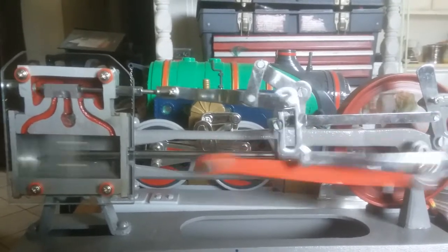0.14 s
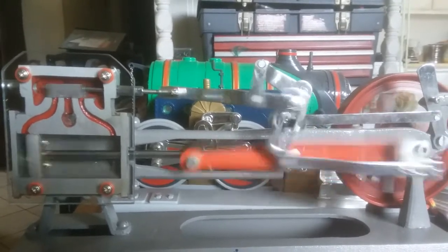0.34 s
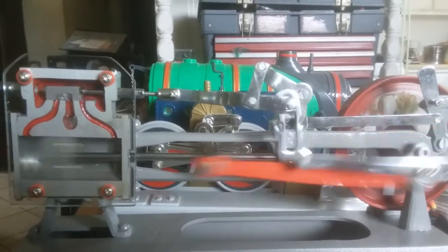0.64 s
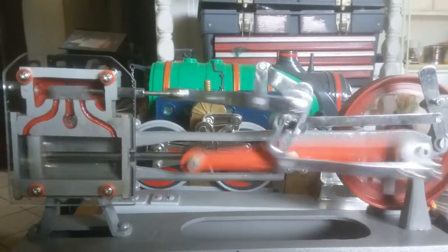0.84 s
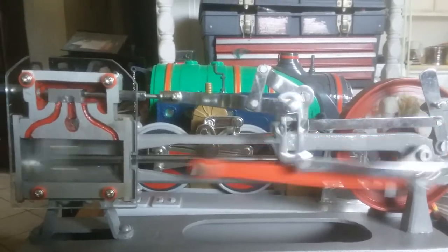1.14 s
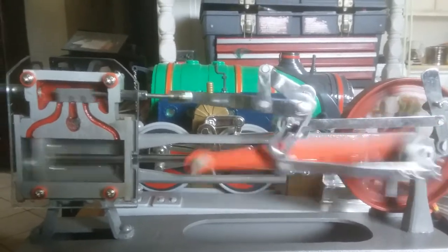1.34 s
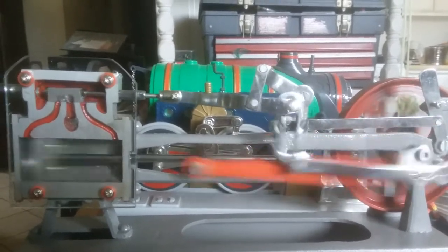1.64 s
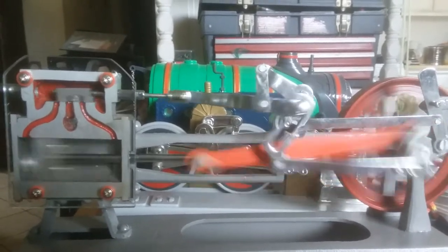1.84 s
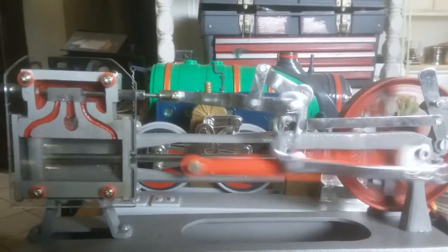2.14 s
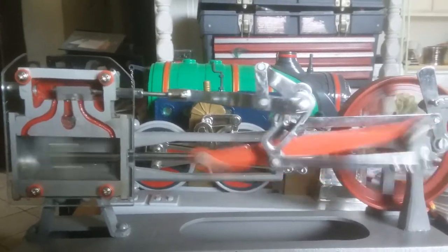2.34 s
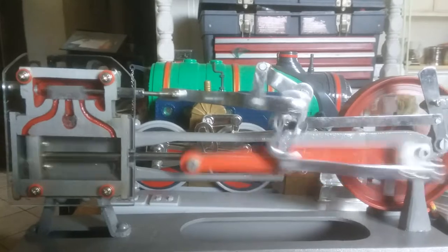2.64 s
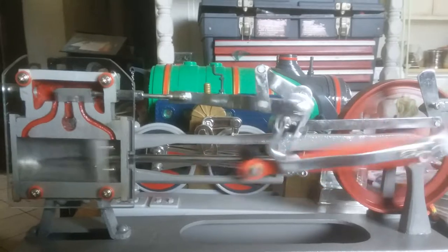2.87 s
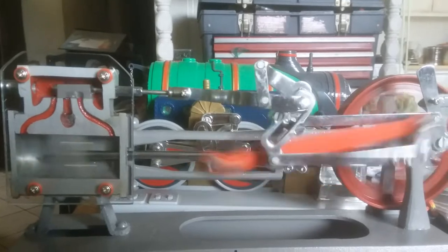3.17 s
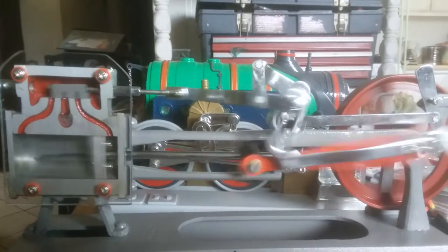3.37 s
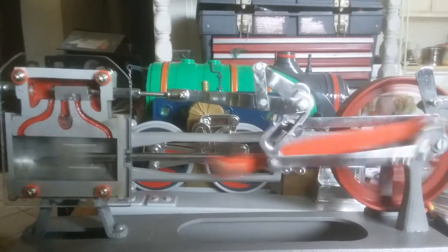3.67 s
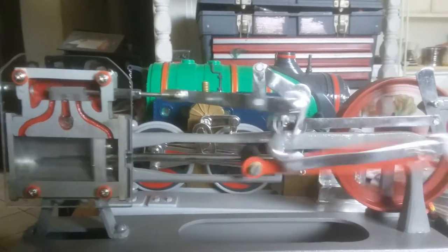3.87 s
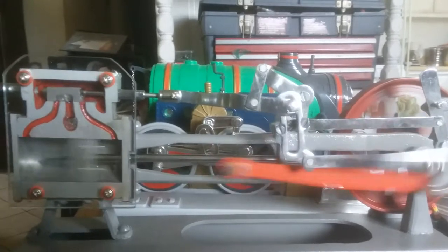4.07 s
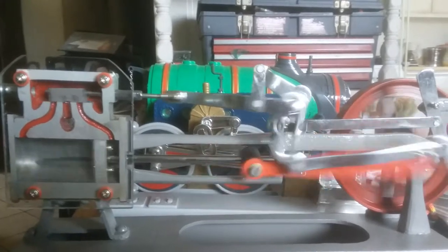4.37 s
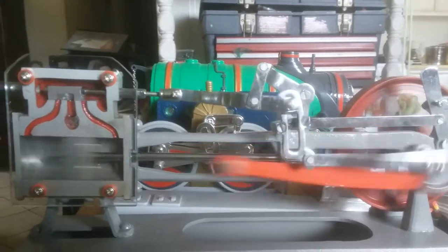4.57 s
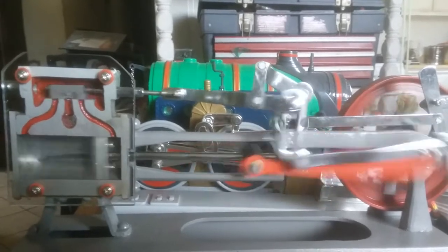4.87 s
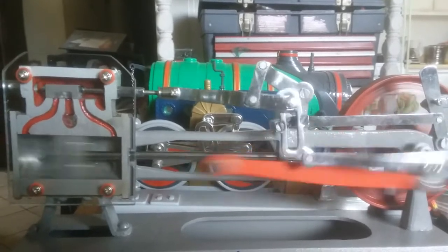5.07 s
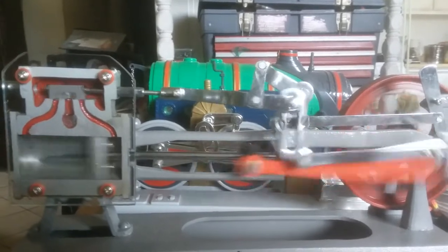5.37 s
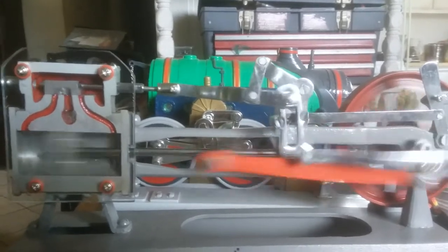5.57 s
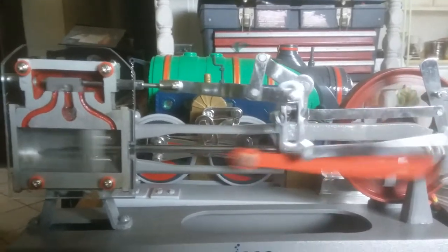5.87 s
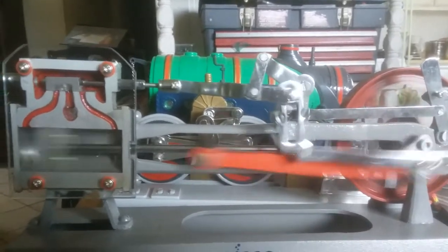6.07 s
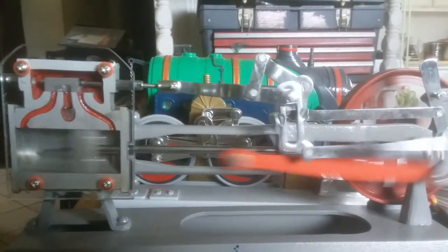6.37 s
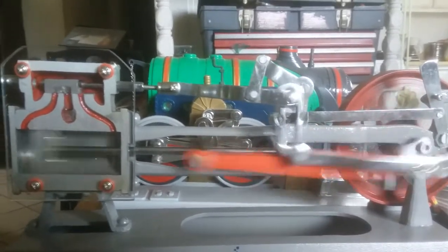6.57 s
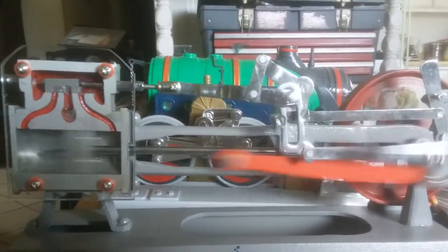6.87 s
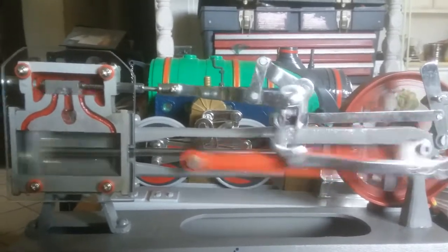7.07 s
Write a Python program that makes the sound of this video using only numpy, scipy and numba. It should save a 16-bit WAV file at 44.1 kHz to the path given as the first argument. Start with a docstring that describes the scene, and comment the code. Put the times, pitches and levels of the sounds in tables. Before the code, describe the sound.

From 0 s a small cutaway engine model is already running at full speed on a workbench, very close to a stereo phone microphone. Countless tiny rubs and rattles of rods, slides and gears fuse into a loud, hollow, midrange whirring roar, with about twenty-two turns a second felt as a fast, shallow flutter. Grainy scraping and thin hiss lie on top; a faint hum, wavering gear tone and very weak high whine hide beneath. The roar swells gently until about 1.7 s, sags toward 2.8 s, jumps up quickly around 3 s, then eases down to about 4.1 s. It rises again to nearly 5 s and stays strong, with rougher chatter, until it cuts off running at about 7 s. The small workshop adds short, dull reflections and barely audible low rumble. Peaks are squashed and slightly crunchy.

```python
"""A small engine model whirs steadily on a workbench, close to a phone with two microphone ports.
Dense rubbing and rattling of rods, slides and gears is noise that rings the frame, bed and bench.
The drive adds a faint hum, gear tone and whine as sines locked to its shaft; the room rumbles low.
The phone's quick gain control ducks every surge of the roar, and the loudest peaks clip."""
import sys
import numpy as np
from scipy import signal
from scipy.fft import rfft, irfft, next_fast_len
from scipy.io import wavfile
from scipy.ndimage import uniform_filter1d
from numba import njit

SR = 44100
rng = np.random.default_rng(int(sys.argv[2]) if len(sys.argv) > 2 else 0)


def unload_wav(signal):
    """Save mono or channel-first audio to the path in sys.argv[1] as 16-bit WAV at rate SR, clipped to [-1, 1]."""
    wavfile.write(
        sys.argv[1],
        SR,
        np.round(np.clip(np.atleast_2d(signal).T, -1, 1) * 32767).astype(np.int16),
    )


N = 318392
PORT_LAG_S = 21 / 44100  # the right port hears later
SHAFT_HZ, SHAFT_WANDER = 21.885, .0008  # turns a second; scale of the wander as a share of the speed
ROOM_T60_S, ROOM_DB, ROOM_DULL_HZ = .3, -17, 2500  # the echoes fade above the last

# whir: overall level, then the pitches where slides take over from frame and where throbless hiss starts
WHIR_DB, SCRAPE_FROM_HZ, HISS_FROM_HZ = -8.5, 1340, 2500
RUMBLE_PER_LOAD = 1.08  # dB of frame rumble for each dB of load
CHATTER_DB, CHATTER_RATE_HZ = 0.78, 55  # unevenness of the slides at mean load, changes a second
CHATTER_PER_LOAD = 1.8  # dB of growth in the chatter's depth for each dB of load
FRAME_THROB_DB, SLIDE_THROB_DB = 0.7, 0.45  # peak swell, twice a shaft turn and once a turn

HUM_ORDER, GEAR_ORDER, WHINE_ORDER = 8, 62, 216  # cycles per shaft turn
HUM_DB, GEAR_DB, WHINE_DB = -35, -34, -45  # middle peak levels at the left port
WHINE_WOBBLE_RAD = 2.2
RUMBLE_DB = -58
GAIN_TOP_DB, GAIN_RATIO, GAIN_ATTACK_S, GAIN_RELEASE_S = -14, 1.87, 0.0041, 0.014
CLIP_LEVEL, TOP_HZ = .9, 15750


def undb(db):
    """Gain of a level in dB."""
    return 10 ** (np.asarray(db) / 20)


def curve(seconds, db):
    """A control curve at every sample, in dB about its mean."""
    line = np.interp(np.arange(N) / SR, seconds, db)
    return line - line.mean()


def walk(rate):
    """Random levels held 1 / rate s and slewed twice; spread near 1."""
    hold = int(SR / rate)
    steps = np.repeat(rng.standard_normal(N // hold + 1), hold)
    slewed = uniform_filter1d(uniform_filter1d(steps, hold), hold)
    return 1.3 * slewed[:N]


def shaft():
    """Angle in radians of the slightly wandering drive shaft, summed from its speed."""
    speed_hz = SHAFT_HZ * (1 + SHAFT_WANDER * walk(1.5))
    return 2 * np.pi * np.cumsum(speed_hz) / SR


def contacts(size, grain_db):
    """Spectrum of countless tiny contacts of uneven strength: noise with random gain on each sample."""
    strength = undb(grain_db * rng.exponential(size=size))
    return rfft(rng.standard_normal(size) * strength)


def echoes(size):
    """Response of the direct path plus a short, dulled random tail from walls and shelves."""
    s = np.arange(SR // 2) / SR
    tail = rng.standard_normal(len(s)) * undb(-60 * s / ROOM_T60_S) * (s > .003)
    tail = tail / np.sqrt(np.sum(tail ** 2))
    hz = np.arange(size // 2 + 1) * SR / size
    dull = 1 / (1 + 1j * hz / ROOM_DULL_HZ)
    return 1 + undb(ROOM_DB) * dull * rfft(tail, size)


# Resonances of frame, bed and bench. Each row: centre in Hz, width in Hz before the skirts are steepened,
# relative level at left and at right port in dB, phase of the right port in radians,
# share of the sound that is alike at both ports (0-1).
RESONANCES = [(118.0, 100.0, -28.7, -30.3, -0.3, 0.73), (205.0, 170.0, -18.1, -19.3, 0.4, 0.95),
              (369.0, 150.0, -19.9, -19.1, 0.7, 0.93), (492.0, 110.0, -18.0, -14.8, 0.4, 0.88),
              (564.0, 80.0, -25.4, -22.0, -2.5, 1.0), (689.0, 61.0, -6.8, -6.6, 1.6, 0.9),
              (755.0, 88.0, -5.4, -6.3, 1.3, 0.94), (824.0, 84.0, -0.8, -0.7, 1.3, 0.94),
              (916.0, 100.0, -5.0, -7.5, 1.5, 0.93), (1020.0, 140.0, -8.7, -5.3, 1.6, 0.91),
              (1120.0, 120.0, -12.6, -7.5, 1.3, 0.89), (1240.0, 140.0, -13.6, -13.8, 1.0, 0.91),
              (1340.0, 110.0, -12.1, -9.2, 1.6, 0.86), (1530.0, 150.0, -13.0, -12.8, 1.8, 0.67),
              (1650.0, 520.0, -20.9, -14.8, 2.1, 0.59), (2060.0, 590.0, -29.9, -11.8, 0.2, 0.8),
              (2160.0, 700.0, -17.1, -30.6, 1.9, 0.89), (2690.0, 430.0, -26.3, -19.2, 1.2, 0.65),
              (3110.0, 1400.0, -23.4, -27.3, -0.4, 0.1), (3940.0, 900.0, -23.6, -30.6, 0.2, 0.42),
              (4750.0, 880.0, -23.2, -25.1, -0.8, 0.5), (5590.0, 1300.0, -22.8, -23.2, -0.3, 0.5),
              (6530.0, 1600.0, -23.3, -25.8, 0.4, 0.37), (7450.0, 1600.0, -21.8, -30.5, 2.3, 0.25),
              (8060.0, 1100.0, -25.9, -23.8, -2.4, 0.49), (8840.0, 670.0, -35.5, -27.7, -2.1, 0.5),
              (10700.0, 2200.0, -34.6, -24.8, -1.2, 0.52), (12300.0, 5800.0, -30.2, -34.1, -2.1, 0.48),
              (13600.0, 2700.0, -32.3, -25.9, 2.7, 0.55), (15300.0, 2700.0, -29.9, -34.6, -2.6, 0.43)]
# Level of the whir, rising and sagging with the load. Each row: time in seconds,
# level in dB (centred on the mean of the whole curve when played).
LOAD_CURVE = [(0.0, -0.5), (1.67, 1.45), (2.76, -1), (3.04, 2.6), (4.1, -0.4), (4.91, 2.5), (7.22, 2.5)]


def whir(turn):
    """One stream of contacts rings all resonances; the right port hears it later and only partly alike."""
    size = next_fast_len(N)
    hz = np.arange(1, size // 2 + 2) * SR / size  # starts one bin up to avoid dividing by zero
    left_power, right_power, alike_sum, weight_sum = 0, 0, 0, 0
    for centre_hz, width_hz, left_db, right_db, phase, share in RESONANCES:
        detune = (hz ** 2 - centre_hz ** 2) / (hz * width_hz)
        ring = 1 / (1 + detune ** 2) ** 2  # power of a steep resonance
        left_power = left_power + ring * undb(2 * left_db)
        right_power = right_power + ring * undb(2 * right_db)
        weight = (ring * undb(left_db + right_db)) ** 2
        alike_sum = alike_sum + weight * share * np.exp(1j * phase)
        weight_sum = weight_sum + weight
    alike = alike_sum / weight_sum  # the strongest resonance at each pitch counts most

    direct, diffuse = contacts(size, grain_db=1.5), contacts(size, grain_db=1.0)
    lag = np.exp(-2j * np.pi * hz * PORT_LAG_S)
    unlike = np.sqrt(1 - np.abs(alike) ** 2 + 1e-9)
    right_contacts = alike * direct * lag + unlike * diffuse
    ports = np.array([np.sqrt(left_power) * direct, np.sqrt(right_power) * right_contacts])
    ports = ports * echoes(size)

    # crossfades over pitch: frame, then slides, then their hiss
    slides = 1 / (1 + (SCRAPE_FROM_HZ / hz) ** 4)
    hiss = 1 / (1 + (HISS_FROM_HZ / hz) ** 6)
    frame_sound = irfft(ports * (1 - slides), size)[:, :N]
    scrape_sound = irfft(ports * slides * (1 - hiss), size)[:, :N]
    hiss_sound = irfft(ports * slides * hiss, size)[:, :N]

    load_db = curve(*np.transpose(LOAD_CURVE))
    # the slides chatter, the more so under load
    chatter_db = CHATTER_DB * undb(CHATTER_PER_LOAD * load_db) * walk(CHATTER_RATE_HZ)
    frame_sound = frame_sound * undb(RUMBLE_PER_LOAD * load_db + FRAME_THROB_DB * np.sin(2 * turn))
    scrape_sound = scrape_sound * undb(SLIDE_THROB_DB * np.sin(turn))
    slide_sound = (scrape_sound + hiss_sound) * undb(load_db + chatter_db)
    out = frame_sound + slide_sound
    return out * undb(WHIR_DB) / np.sqrt(np.mean(out ** 2))


def drive(turn):
    """Hum, gear tone and tooth whine are sines locked to the shaft; the whine wobbles once a turn."""
    hum = undb(HUM_DB + 0.83 * walk(3.0)) * np.sin(HUM_ORDER * turn + 0.4 * walk(5.5))
    wobble = WHINE_WOBBLE_RAD * np.sin(turn)
    whine = undb(WHINE_DB + 4 * walk(3.4)) * np.sin(WHINE_ORDER * turn + wobble)
    gear = undb(GEAR_DB + 3.8 * walk(6.4)) * np.sin(GEAR_ORDER * turn + 1.5 * walk(12))
    left = hum + whine + gear
    late = np.roll(undb(-9) * whine + undb(0.5) * gear, int(PORT_LAG_S * SR))
    right = undb(0.5) * hum + late
    return np.array([left, right])


def workshop():
    """Low rumble of the room: band-passed noise, partly alike at both ports."""
    mid, left, right = rng.standard_normal((3, N))
    band = signal.butter(2, [55, 110], "bandpass", fs=SR, output="sos")
    low = signal.sosfilt(band, [mid + .6 * left, .8 * mid + .6 * right])
    return low * undb(RUMBLE_DB) / np.sqrt(np.mean(low ** 2))


def scene():
    """Whir, drive tones and room together."""
    turn = shaft()
    return whir(turn) + drive(turn) + workshop()


@njit
def follow(x, attack, release):
    """Envelope that rises at one speed and falls at another."""
    out, level = np.empty(len(x)), x[:2000].mean()
    for i in range(len(x)):
        level += (x[i] - level) * (attack if x[i] > level else release)
        out[i] = level
    return out


def record(dry):
    """Gain control shared by both ports ducks the surges; the loudest peaks clip; the top is cut."""
    loudness = follow(np.abs(dry).mean(axis=0), 1 / (GAIN_ATTACK_S * SR), 1 / (GAIN_RELEASE_S * SR))
    gain = np.minimum(1, undb(GAIN_TOP_DB) / loudness) ** (1 - 1 / GAIN_RATIO)
    clipped = np.clip(gain * dry, -CLIP_LEVEL, CLIP_LEVEL)
    top_cut = signal.ellip(16, .2, 85, TOP_HZ, fs=SR, output="sos")
    return signal.sosfilt(top_cut, clipped)


dry = scene()
out = record(dry)
unload_wav(out)
```